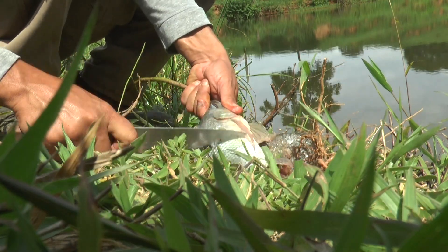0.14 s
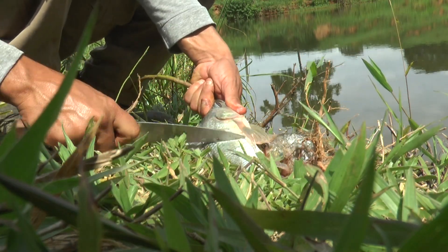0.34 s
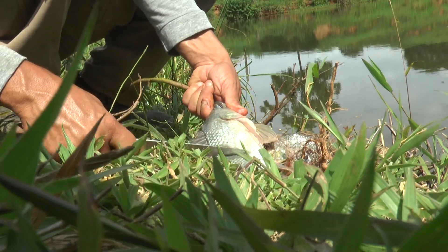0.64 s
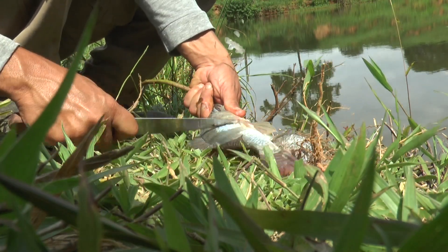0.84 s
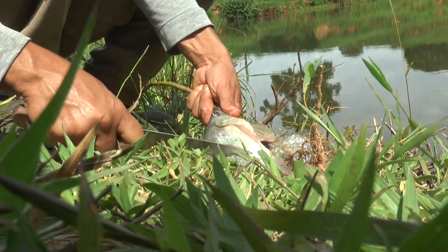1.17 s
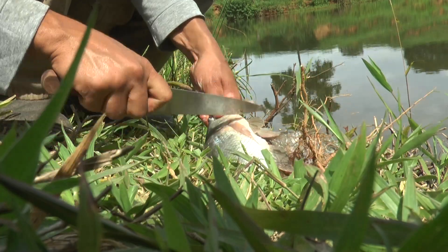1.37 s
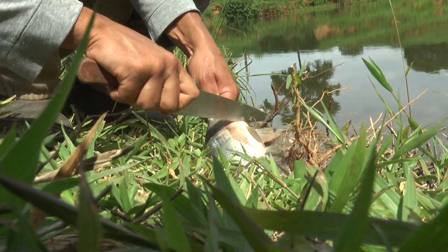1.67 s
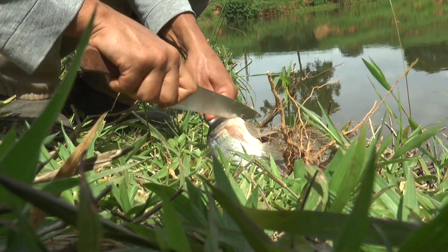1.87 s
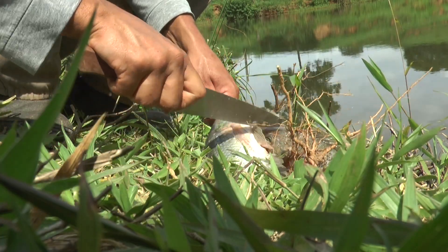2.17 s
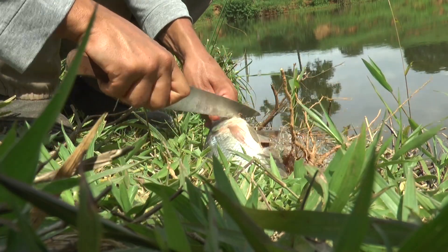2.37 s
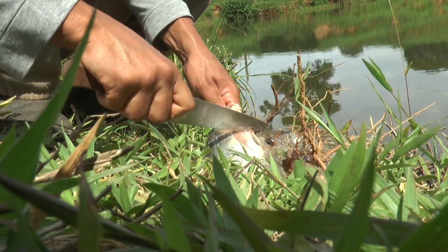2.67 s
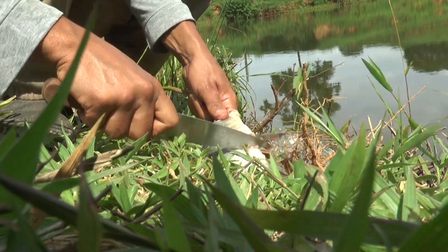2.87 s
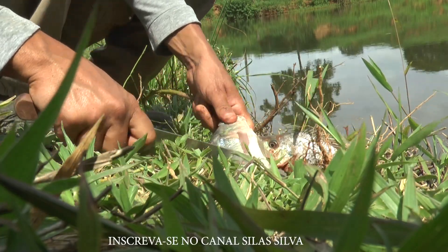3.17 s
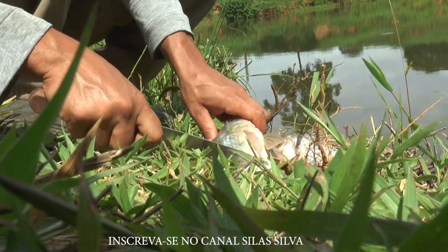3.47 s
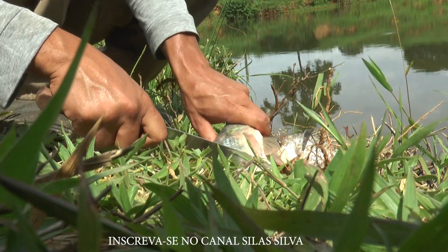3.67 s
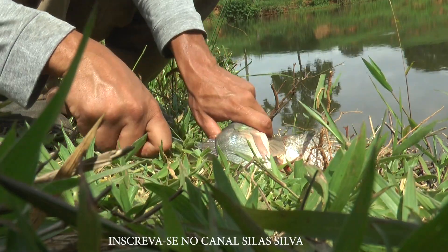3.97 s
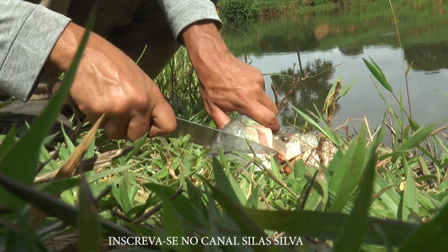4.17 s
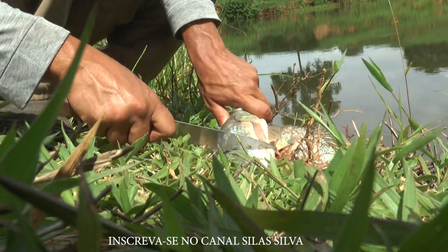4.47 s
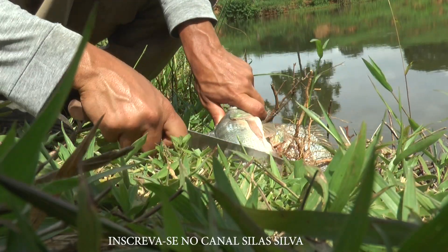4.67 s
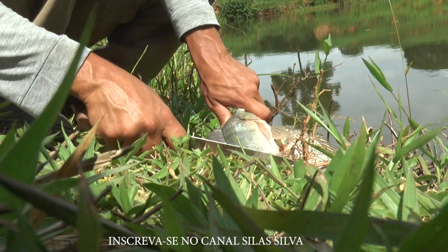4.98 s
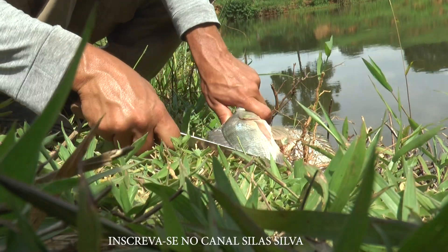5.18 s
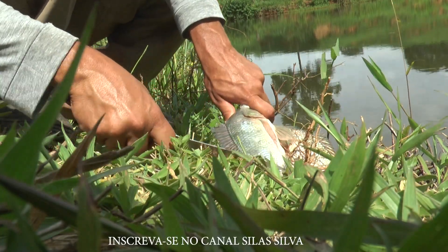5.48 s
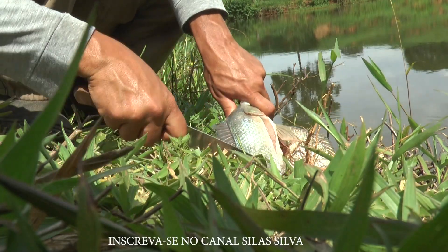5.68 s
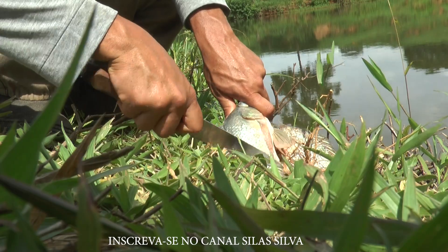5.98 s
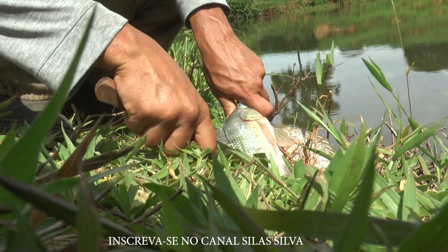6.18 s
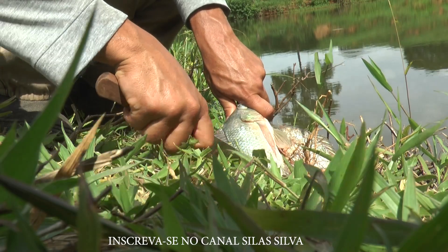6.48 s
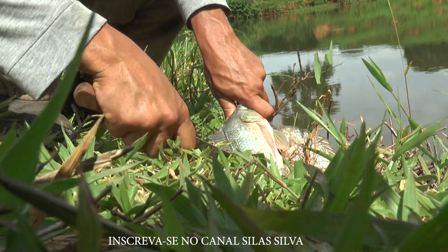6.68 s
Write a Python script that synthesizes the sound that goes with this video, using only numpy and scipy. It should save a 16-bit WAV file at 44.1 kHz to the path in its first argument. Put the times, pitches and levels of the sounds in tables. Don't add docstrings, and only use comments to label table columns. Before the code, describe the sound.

Irregular bursts of metallic fish scaling, crisp snaps and soft thuds on turf beside a pond, steady bird chirps and a distant low pump hum.

```python
import sys
import numpy as np
from scipy import signal
from scipy.fft import rfft, irfft, next_fast_len
from scipy.io import wavfile
from scipy.ndimage import uniform_filter1d, map_coordinates

SR = 44100
rng = np.random.default_rng(int(sys.argv[2]) if len(sys.argv) > 2 else 0)


def invert_db(level):
    return 10 ** (np.asarray(level, dtype=float) / 20)


def transcribe(signal):
    frames = np.atleast_2d(signal).T
    limited = np.clip(frames, -1, 1)
    pcm = np.round(limited * 32767).astype(np.int16)
    wavfile.write(sys.argv[1], SR, pcm)


N = 301203
LEAD_S = 0.012

# start_s, length_ms, blade_db, fish_rel_db
BACK_SLIPS = [(.002, 9.7, -49.5, -6), (0.024, 11.4, -42.5, -8.5), (0.058, 8.1, -55, 3),
              (0.085, 9.8, -42, -3.5), (0.107, 6.5, -37.5, -9), (0.216, 8.8, -37, -9),
              (0.237, 15.4, -49, -1.5), (0.258, 5.8, -37.5, -12), (0.28, 16.6, -52.5, -1),
              (.313, 9.4, -44, -10), (.326, 17.4, -50, -5.5), (0.349, 15.3, -48.5, -7),
              (0.439, 1.55, -45, -16), (.612, 19, -60.5, -26), (0.734, 23.4, -55, -1.5),
              (0.802, 6.4, -56, -6), (.81, 22, -48.5, -7), (.829, 8.7, -50.5, -6), (.838, 9.4, -44, -8),
              (.85, 13, -43.5, -8), (.863, 11, -49, -2.5), (0.874, 4.1, -45, -15), (.879, 4.6, -51, -1),
              (.885, 19, -43, -9), (.907, 13.6, -53.5, 3), (.919, 5.2, -41, -12), (0.929, 3.2, -51, -4),
              (1.155, 17.5, -49.5, -7.5), (1.223, 17.4, -61.5, -4), (1.249, 3.9, -49, -5),
              (1.255, 7.2, -59, 4), (1.265, 21, -41.5, -8.5), (1.286, 13, -46.5, -6.5),
              (1.299, 11, -51, -7), (1.332, 2.7, -44, -6), (1.429, 16, -64, 10), (1.45, 4, -44, -8),
              (1.455, 15.4, -47.5, -2), (1.49, 25, -62.5, 3), (1.52, 7.9, -48, -3), (1.527, 8.3, -42.5, -6),
              (1.55, 16.4, -41.5, -5), (1.568, 9, -54, 3), (1.584, 5.7, -41, -10), (1.589, 11, -50, -6),
              (1.707, 13, -45, -9), (1.727, 7.3, -50.5, -11)]
# start_s, length_ms, blade_db, fish_rel_db
BELLY_SLIPS = [(1.96, 6.9, -67, -8), (1.978, 5, -61, -13), (2.031, 28, -59, -5.5), (2.061, 9, -51, 1),
               (2.073, 2.9, -47, -2), (2.078, 5.8, -60, 5), (2.097, 3.5, -41, 3.5), (2.205, 13, -54.5, 1.5),
               (2.226, 13, -66.5, 15.5), (2.336, 19, -67.5, 11.5), (2.353, 5.1, -47.5, 4),
               (2.425, 14, -65, 10), (2.451, 3.9, -60, 12), (2.469, 2.5, -54, 6), (2.48, 2.7, -51, 4),
               (2.521, 11, -60.5, 10), (2.536, 3.6, -49, 8), (2.546, 7.3, -56, 5), (2.558, 7.1, -45.5, 3),
               (2.573, 9.2, -50.5, 8), (2.591, 2, -60, 12), (2.82, 7.5, -45, -5), (2.837, 5.3, -47.5, 2.5),
               (2.86, 8.7, -37, -0.5), (2.953, 9.3, -60, 11), (3.07, 4.7, -42, -1), (3.08, 4.9, -49.5, 2),
               (3.089, 5.4, -35.5, 4.5), (3.142, 8, -55, 6), (3.187, 3.6, -58.5, 15), (3.223, 15, -60, 7),
               (3.31, 8.6, -46.5, 8.5), (3.417, 5.3, -50.5, 9.5)]
# start_s, length_ms, blade_db, fish_rel_db
FLANK_SLIPS = [(3.517, 8.7, -46.5, -12), (3.528, 12.4, -43, -13), (3.544, 4.8, -46, -4),
               (3.552, 18, -61, -4), (3.576, 3.5, -61, 4), (3.771, 18, -53.5, -5), (3.863, 33, -63, 4),
               (3.924, 13.4, -58, 1), (3.944, 13.2, -50, 0.5), (4.123, 3, -58.5, -10),
               (4.271, 2.5, -47, -3), (4.368, 22, -60, 1.5), (4.623, 21, -58, 3.5),
               (4.646, 30.5, -50.5, -6.5), (4.681, 9.3, -58.5, -1), (4.69, 43, -64.5, 2),
               (4.76, 38, -57, -4), (4.809, 3, -59, 4), (4.824, 18, -59, -1), (4.843, 9, -58, -1.5),
               (4.9, 12.4, -60, -2), (4.915, 10.8, -48.5, -10.5), (4.935, 33, -56.5, 0),
               (4.968, 12.7, -52, -11), (4.982, 9.3, -49.5, -10), (4.996, 5.3, -48.5, -4),
               (5.01, 12, -63, 2), (5.057, 10, -58, -5), (5.074, 10, -48.5, -14), (5.099, 2.4, -56, -11),
               (5.105, 30, -63.5, -1), (5.16, 28, -64, 0), (5.138, 13, -50, -11.5), (5.199, 7.8, -62, -6),
               (5.215, 26, -48, -3.5), (5.254, 3.7, -45, -4), (5.259, 28, -54.5, -2),
               (5.317, 2.7, -45.5, -1), (5.323, 3, -47, -13), (5.329, 3.7, -54, -8), (5.338, 2.7, -57, -8),
               (5.348, 1.8, -44, -14), (5.398, 3.4, -51.5, 2.5), (5.403, 29, -60, -2),
               (5.433, 11.6, -53.5, -2), (5.459, 8, -57.5, 7.5)]
# start_s, length_ms, blade_db, fish_rel_db
TAIL_SLIPS = [(5.834, 48, -54, 3.5), (5.892, 11.7, -46, -2), (5.912, 12, -42.5, -3.5),
              (5.933, 20.4, -49, -6), (6.003, 38, -60, 1.5), (6.04, 12, -66, -15), (6.104, 12, -63.5, -2),
              (6.133, 22, -52.5, -1.5), (6.167, 10, -52.5, 3), (6.183, 13.5, -52.5, 2),
              (6.274, 77, -66, -2), (6.447, 29, -61, -21), (6.488, 44, -59.5, -1.5), (6.532, 40, -50, -7),
              (6.673, 7.7, -55.5, -10), (6.692, 9.3, -60, 1.5), (6.783, 2.45, -41, -9.5),
              (6.793, 19, -52, 1), (6.816, 8.4, -49.5, 2)]
REGION_FIZZ_DB = [
    -4,
    -2,
    -4.5,
    -2,
]
# time_s, edge_rel_db
BLADE_ANGLE = [(0, -4.5), (.45, 0), (.75, 2), (.81, 3), (1.27, 5.5), (1.31, -6), (1.53, 5.5), (1.59, 5),
               (1.71, -0.5), (1.95, -12), (2.08, -0.5), (2.35, -4), (2.85, -10.5), (3.1, -3.5), (3.85, 3),
               (4.4, 2), (5.2, -4), (5.9, -1)]
# time_s, share_0_to_1
RING_SHARE = [(0, 0.77), (3.9, 0.81), (4.4, 0.4), (6.83, 0.57)]
# pitch_hz, width_hz, level_db
BLADE_MODES = [(3313, 278, 5), (3770, 73, 10.5), (4396, 420, 9)]
# pitch_hz, width_hz, level_db
FISH_MODES = [(960, 340, -3.5), (1463, 320, 6), (1773, 373, 3), (2072, 167, 2.5)]
# pitch_hz, width_hz, level_db
EDGE_MODES = [(4816, 290, 2.5), (5395, 95, 1.5), (6170, 280, 9), (6190, 600, 2.5), (7225, 690, -2.5)]
# pitch_hz, width_hz, level_db
FIZZ_MODES = [(8230, 1180, 13.5), (9970, 520, 12.5), (9860, 1040, -7), (14200, 9400, -5)]
# pitch_hz, width_hz, level_db
BODY_MODES = [(133, 64, 3), (330, 160, 3.5), (800, 1800, -10)]
FIZZ_PER_ANGLE, FIZZ_LOSS_PER_WET = 1.05, 0.4

# start_s, length_ms, pitch_hz, level_db
SUNG_MODES = [(0.106, 5.6, 4230, -39), (.214, 10, 4250, -43), (.314, 9, 6250, -51),
              (2.45, 5.4, 1700, -48.5), (2.558, 7.7, 1660, -45), (2.861, 12, 1990, -42.5),
              (3.09, 8.5, 1520, -46), (3.417, 6, 1500, -45), (5.074, 9.2, 4000, -53),
              (.811, 18, 5180, -41.5), (.811, 17, 6830, -41), (.839, 27, 5150, -42),
              (.885, 16, 6220, -38.5), (.887, 19, 4840, -47), (1.265, 20, 3320, -45),
              (1.266, 18, 4240, -42), (1.266, 17, 6220, -41), (1.452, 15, 6860, -53),
              (1.521, 12, 6770, -36), (1.55, 21, 6500, -51), (2.095, 4.2, 2240, -44),
              (5.936, 14, 10000, -52), (3.775, 12, 5300, -60), (3.945, 12, 6450, -55),
              (4.64, 38, 5570, -50), (5.14, 14, 4600, -55), (5.213, 25, 6080, -51.5),
              (5.894, 17, 4820, -46), (6.134, 18, 4950, -52), (6.18, 18.7, 4940, -45)]
SING_WIDTH_HZ = 165

# start_s, peak_db, pitch_hz
SNAPS = [(0.57, -43, 5000), (0.5897, -44, 6000), (0.621, -48, 5000), (0.6697, -39.5, 5100),
         (1.047, -43, 6500), (1.417, -48, 6500), (1.9538, -28.5, 4460), (2.074, -38, 9500),
         (2.0951, -33, 2650), (2.0985, -32, 7000), (2.2294, -52, 7000), (3.093, -28.5, 2620),
         (4.1874, -56, 6500), (4.5615, -60, 6500), (4.811, -43, 3800), (4.989, -36, 5000),
         (4.998, -37, 9000), (5.2538, -24, 3030), (5.293, -43, 10100), (5.348, -41, 9500),
         (5.389, -46, 6500), (5.505, -50, 7000), (5.7438, -54, 6500), (5.985, -45, 8000), (6.22, -55, 6000),
         (6.348, -40, 5500), (6.393, -48, 9000), (6.5192, -21.5, 7400)]
SNAP_CYCLES, SPLINTER_DB, SPLINTER_S = 2.7, -3, 0.0013

# start_s, peak_db
BUMPS = [(0.313, -41), (0.915, -42), (1.291, -31.5), (1.44, -39), (1.534, -42), (1.587, -35), (1.706, -41),
         (2.816, -38), (3.084, -40), (3.31, -40.5), (3.505, -43), (3.537, -40), (3.775, -42), (5.29, -49.5),
         (5.33, -45), (5.358, -52), (6.39, -48), (0.74, -51.5), (3.23, -46), (5.512, -51), (5.893, -46),
         (3.947, -42), (6.805, -42.5)]

# start_s, peak_db
BONE_RAPS = [
    (5.021, -47),
    (5.518, -42.5),
    (5.895, -37),
    (6.013, -46),
    (6.159, -43),
    (6.346, -51),
]
# pitch_hz, width_hz, level_db
BONE_MODES = [(754, 400, 8), (1040, 210, -13)]

# time_s, leaf_db
GRASS_STIR = [(0, -75), (2.5, -78), (2.7, -79.5), (3.9, -72), (4.1, -85.5), (4.55, -76.5), (4.8, -73),
              (5.31, -67.5), (5.55, -73.5), (5.8, -106), (6, -81), (6.83, -71)]
# pitch_hz, level_db_per_hz
LEAF_SPECTRUM = [(1500, -40), (2600, 1.5), (4000, 17.5), (6500, 5), (9000, -5.5), (15000, -54)]
# pitch_hz, level_db_per_hz
STALK_SPECTRUM = [(300, 1), (700, -1), (1500, 4), (2200, -5.5), (3500, -16)]
STALK_DB, STALK_PER_LEAF_DB, STIR_MID_DB = -66.5, 0.68, -74

# first_s, last_s, spacing_s
CHIRP_BOUTS = [
    (.061, 1.678, .1155),
    (1.798, 2.883, .1205),
    (3.011, 3.257, .123),
    (3.368, 3.755, .129),
    (3.875, 4.498, .1247),
    (4.627, 5.668, .13),
    (5.792, 6.713, .1315),
]
# time_s, top_hz, rms_db, fall_share
CHIRPER = [(0, 3870, -67, .07), (1.3, 3950, -70, .15), (1.75, 3980, -64.5, .2), (2.65, 4020, -63, .25),
           (3.1, 4120, -63, .2), (3.6, 4120, -67, .12), (4.5, 4340, -66, .07), (5.05, 4450, -64, .07),
           (5.4, 4600, -64, .39), (6.05, 4650, -61.5, .41), (6.83, 4680, -60, .43)]
# time_s, rel_db, lag_ms
ANSWERER = [
    (1.3, -4, 15),
    (1.799, -2.5, 25.5),
    (2.201, -5.5, 7.5),
    (3.099, -3, -4),
    (4.099, -6, -11.5),
    (4.601, -9, -6.5),
    (5.4, -24, -1),
]
# multiple, level_db
ANSWER_PARTIALS = [(1, -15), (3, 0), (4, -17)]
# first_s, pitch_hz, rms_db
PAIRED_PIPS = [
    (3.6, 4450, -79),
    (3.724, 4350, -64),
    (3.85, 4540, -70),
    (3.975, 4460, -67),
    (4.1, 4560, -66),
    (4.226, 4550, -68),
]
PIP_MS, PIP_GAP_S = 9, 0.036
# start_s, length_ms, start_hz,
# end_hz, rms_db
SCATTERED_GLIDES = [(.37, 18, 5850, 6340, -64), (.384, 13, 5470, 4940, -63), (.457, 28, 6000, 7150, -69),
                    (.46, 25, 4700, 5400, -80), (.553, 21, 6160, 6800, -64.5), (0.732, 26, 6620, 6130, -52),
                    (1.06, 13, 5200, 5170, -67), (1.078, 16, 5850, 5200, -70), (1.377, 29, 5370, 5040, -64),
                    (1.612, 18, 5520, 4800, -61), (2.206, 11, 4660, 4550, -46), (1.378, 16, 6300, 7100, -74),
                    (5.754, 10, 7300, 7200, -71)]
ARCH_HZ = 288
# time_s, pitch_hz, rms_db
WHISTLE_GLIDES = [
    [(.94, 2620, -70), (.97, 2990, -68), (1.01, 3174, -61.5), (1.08, 3220, -56), (1.18, 3150, -66),
     (1.27, 3040, -65), (1.34, 2990, -72)],
    [(4.24, 2240, -86), (4.31, 2374, -76), (4.38, 2540, -76), (4.45, 2780, -72), (4.52, 2850, -76),
     (4.61, 2760, -73)],
    [(4.17, 2460, -90), (4.31, 3050, -70)],
]

# pitch_hz, rms_db, waver_db
PUMP_ORDERS = [(59.3, -69, 3.5), (89, -72.5, 3), (118, -72, 1.5), (184, -76, 5), (240.9, -65, 2),
               (270, -76, 3.5)]
# time_s, main_whine_db
PUMP_LOAD = [(0, -0.5), (1.2, 0.5), (1.8, 1), (2.4, -1.5), (3.3, 3), (4.7, 3.5), (4.9, -6), (5.4, 2),
             (5.5, 3), (6.83, 1.5)]

# pitch_hz, level_db_per_hz
AIR_SPECTRUM = [(20, -33), (30, -9), (50, -15), (90, -5), (184, -0.5), (300, -6), (637, -13), (1280, -17.5),
                (2520, -20.5), (4450, -18), (6500, -22.5), (8490, -29.5), (14600, -38), (15800, -26)]
AIR_DB = -59.5
# pitch_hz, level_db_per_hz
HISS_SPECTRUM = [(25, -26), (60, -10), (150, 7), (1000, -7), (15800, -4)]


def unit(x):
    return x / np.sqrt(np.mean(x ** 2) + 1e-20)


def curves(rows):
    s, *cols = np.transpose(rows)
    return [np.interp(np.arange(N) / SR, s, c) for c in cols]


def wobble(rate_hz):
    knots = rng.standard_normal(int(N * rate_hz / SR) + 4)
    return map_coordinates(knots, [np.arange(N) * rate_hz / SR])


def coloured(x, spectrum):
    m = next_fast_len(N + 8192)
    hz, db = np.transpose(spectrum)
    gain = invert_db(np.interp(np.log(np.fft.rfftfreq(m, 1 / SR) + 1), np.log(hz), db))
    return unit(irfft(rfft(x, m) * gain, m)[..., :N])


def band(x, lo_hz, hi_hz):
    sos = signal.butter(2, [lo_hz, hi_hz], "bandpass", fs=SR, output="sos")
    return signal.sosfilt(sos, x) / np.sqrt(2 * (hi_hz - lo_hz) / SR)


def grains(rate_hz, spread_db, clump_db):
    struck = rng.random(N) < rate_hz / SR
    size = rng.standard_normal(N) * invert_db(spread_db * rng.exponential(size=N))
    return unit(struck * size * invert_db(clump_db * wobble(330)))


def ring(drive, modes, vary_db):
    out, power = 0, 0
    for k, (hz, width_hz, db) in enumerate(modes):
        b, a = signal.iirpeak(hz, hz / width_hz / 1.55, SR)
        once = signal.lfilter(b, a, drive * invert_db(db + vary_db * wobble(25)))
        out = out + (-1) ** k * signal.lfilter(b, a, once)
        power += invert_db(2 * db) * 1.55 * np.pi * width_hz / SR / 2
    return out / np.sqrt(power)


def swell(ms, edge_s):
    t = np.arange(-LEAD_S, ms / 1000 + 0.025, 1 / SR)
    bulge = 0.65 + 0.15 * np.sin(np.pi * np.clip(t * 1000 / ms, 0, 1))
    rise = np.minimum(t, 0) / (1.15 * edge_s)
    fall = np.maximum(t - ms / 1000, 0) / (0.93 * edge_s)
    return bulge * np.exp(rise - fall)


def add(track, s, sound):
    sound = sound[max(-round(s * SR), 0):]
    part = track[max(round(s * SR), 0):][:len(sound)]
    part += sound[:len(part)]


def slip_forces():
    force = np.zeros((4, N))
    regions = [BACK_SLIPS, BELLY_SLIPS, FLANK_SLIPS, TAIL_SLIPS]
    for slips, region_db in zip(regions, REGION_FIZZ_DB):
        for s, ms, blade_db, fish_db in slips:
            shape = swell(max(ms - 1, 0.3), edge_s=0.00027 + 0.00022 * ms)
            edge_db = np.interp(s, *np.transpose(BLADE_ANGLE))
            fizz_db = region_db + FIZZ_PER_ANGLE * edge_db - FIZZ_LOSS_PER_WET * max(fish_db, 0)
            for row, rel_db in zip(force, [0, fish_db, edge_db, fizz_db]):
                add(row, s - LEAD_S, invert_db(blade_db + rel_db) * shape)
    return force


def scraping():
    pops = grains(rate_hz=12000, spread_db=1, clump_db=5)
    pops = unit(pops / (uniform_filter1d(pops ** 2, size=160) + 0.054) ** 0.51)
    force = slip_forces()
    unevenness = invert_db([2 * wobble(150) for _ in force])
    blade, fish, edge, fizz = force * pops * unevenness
    rings = ring(blade, BLADE_MODES, vary_db=2.5) + ring(fish, FISH_MODES, vary_db=2.5)
    rings = rings + ring(edge, EDGE_MODES, vary_db=2.5) + ring(fizz, FIZZ_MODES, vary_db=3.0)
    rasp = band(blade, 2450, 4410) - band(fish, 1420, 3260)
    rasp = rasp - band(edge, 4060, 7300) + band(fizz, 8400, 11130)
    push = invert_db(-11.5) * ring(blade, BODY_MODES, vary_db=1.5)
    share = np.clip(curves(RING_SHARE)[0], 0, 1)
    return singing(pops) + push + np.sqrt(share) * rings + np.sqrt(1 - share) * rasp


def singing(pops):
    out = np.zeros(N)
    for s, ms, hz, db in SUNG_MODES:
        shape = swell(ms, edge_s=0.0015)
        drive = shape * pops[round((s - LEAD_S) * SR):][:len(shape)]
        mode = band(drive, hz - SING_WIDTH_HZ / 2, hz + SING_WIDTH_HZ / 2)
        add(out, s - LEAD_S, invert_db(db) * mode)
    return out


def ticks():
    out, t = np.zeros(N), np.arange(-0.002, 0.006, 1 / SR)
    for s, db, hz in SNAPS:
        decay = np.exp(-abs(t) * hz / SNAP_CYCLES * 2)
        snap = 1.23 * (t > 0) * decay * np.sin(2 * np.pi * hz * t)
        spray = np.diff(rng.standard_normal(len(t) + 1))
        splinters = invert_db(SPLINTER_DB) * spray * np.exp(-np.where(t < 0, -2.5 * t, t) / SPLINTER_S)
        splinters = band(splinters, 0.69 * hz, min(0.95 * hz, 15000)) * 0.63
        add(out, s - 0.002, invert_db(db) * (snap + splinters))
    return out


def thuds():
    force = np.zeros(N)
    for s, db in BUMPS:
        add(force, s - LEAD_S, invert_db(db - 7.5) * swell(9.7, edge_s=0.0067))
    return ring(force * rng.standard_normal(N), BODY_MODES, vary_db=2.0)


def knocks():
    force = np.zeros(N)
    for s, db in BONE_RAPS:
        add(force, s - LEAD_S, invert_db(db) * swell(1.7, edge_s=0.00067))
    return ring(force * rng.standard_normal(N), BONE_MODES, vary_db=1.0)


def grass():
    leaf_db, = curves(GRASS_STIR)
    stalk_db = STALK_DB + STALK_PER_LEAF_DB * (leaf_db - STIR_MID_DB)
    stir_db = 2.8 * wobble(30)
    crackle = grains(rate_hz=6000, spread_db=0.55, clump_db=4.0)
    leaves = invert_db(leaf_db + stir_db + 6.5) * coloured(crackle, LEAF_SPECTRUM)
    stalks = invert_db(stalk_db + stir_db) * coloured(crackle, STALK_SPECTRUM)
    return leaves + stalks


def tone(hz, db, taper=0.72):
    knots = rng.normal(0, 4.5, len(hz) // 110 + 2)
    flutter_db = np.interp(np.linspace(0, len(knots) - 1, len(hz)), np.arange(len(knots)), knots)
    level = invert_db(db + 5.5 + flutter_db * taper)
    fade = signal.windows.tukey(len(hz), min(taper, 1))
    return level * np.sin(2 * np.pi * np.cumsum(hz) / SR) * fade


def chirpers(out):
    t = np.arange(-0.016, 0.034, 1 / SR)
    short = t[t < 0.02]
    bend = np.where(short < 0, 0.55, 1) * (short / 0.018) ** 2
    slide = np.where(t < 0, 0.38 * (t / 0.016) ** 2, 0.56 * (abs(t) / 0.034) ** 1.6)
    song_s, *song = np.transpose(CHIRPER)
    answer_s, *answer = np.transpose(ANSWERER)
    for first_s, last_s, gap_s in CHIRP_BOUTS:
        for s in np.linspace(first_s, last_s, round((last_s - first_s) / gap_s) + 1):
            hz, db, fall = (np.interp(s, song_s, c) for c in song)
            second_db, lag_ms = (np.interp(s, answer_s, c) for c in answer)
            db = db + rng.normal(0, 1.0)
            hz = hz * rng.normal(1, 0.0124)
            add(out, s - 0.016, tone(hz * (1 - fall * bend), db))
            for multiple, part_db in ANSWER_PARTIALS:
                glide_hz = multiple * hz * 0.516 * (1 - slide)
                level_db = db + second_db + part_db + rng.normal(0, 2.2)
                add(out, s - 0.016 + lag_ms / 1000, tone(glide_hz, level_db, taper=0.4))


def pips(out):
    for s, hz, db in PAIRED_PIPS:
        for later_s in (0, PIP_GAP_S):
            add(out, s + later_s, tone(np.full(round(PIP_MS * SR / 1000), hz), db))


def scattered_notes(out):
    for s, ms, start_hz, end_hz, db in SCATTERED_GLIDES:
        u = np.linspace(-1, 1, round(ms * SR / 1000))
        glide_hz = (start_hz + end_hz) / 2 + (end_hz - start_hz) / 2 * u
        add(out, s, tone(glide_hz + ARCH_HZ * (1 - u ** 2), db))


def far_bank(x):
    t = np.arange(SR // 4) / SR
    tail = rng.standard_normal(len(t)) * invert_db(-60 * t / 0.13)
    return x + invert_db(-5) * signal.fftconvolve(x, tail / np.linalg.norm(tail))[:N]


def whistles(out):
    for rows in WHISTLE_GLIDES:
        start, stop = round(rows[0][0] * SR), round(rows[-1][0] * SR)
        hz, db = (c[start:stop] for c in curves(rows))
        add(out, rows[0][0], tone(uniform_filter1d(hz, size=900), db, taper=0.1))


def birds():
    out = np.zeros(N)
    chirpers(out)
    pips(out)
    scattered_notes(out)
    out = far_bank(out)
    whistles(out)
    return out


def pump():
    t = np.arange(N) / SR
    lines = []
    for hz, db, waver_db in PUMP_ORDERS:
        level = invert_db(db + 2.0 + waver_db * wobble(3.136))
        lines.append(level * np.sin(2 * np.pi * hz * t + wobble(3.6)))
    beat = 1 + 0.33 * np.cos(2 * np.pi * (t - 1.13) / 1.46)
    whine_change = (invert_db(curves(PUMP_LOAD)[0]) - 1) * lines[4]
    return lines[0] * beat + sum(lines[1:]) + whine_change


def open_air():
    return invert_db(AIR_DB - 3 + 0.85 * wobble(2.45)) * coloured(rng.standard_normal(N), AIR_SPECTRUM)


def scene():
    fish_work = scraping() + ticks() + thuds() + knocks() + grass()
    background = birds() + pump() + open_air()
    return np.tile(fish_work + background, (2, 1))


def low_pass(x):
    return signal.sosfilt(signal.butter(12, 16450, fs=SR, output="sos"), x)


def record(dry):
    hiss = invert_db(-72.5) * coloured(rng.standard_normal((2, N)), HISS_SPECTRUM)
    mix = dry * invert_db([[2.3], [-3.2]]) + hiss
    m = next_fast_len(N)
    passed = np.fft.rfftfreq(m, 1 / SR) < 15830
    mix = irfft(rfft(mix, m) * passed, m)[:, :N]
    return low_pass(mix)


dry = scene()
out = record(dry)
transcribe(out)
```